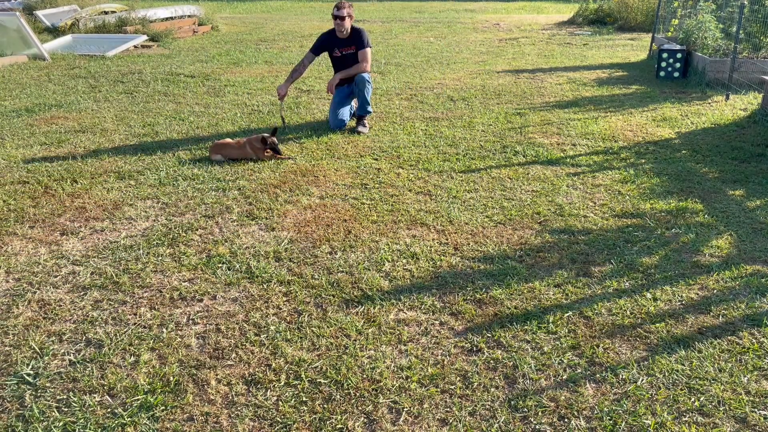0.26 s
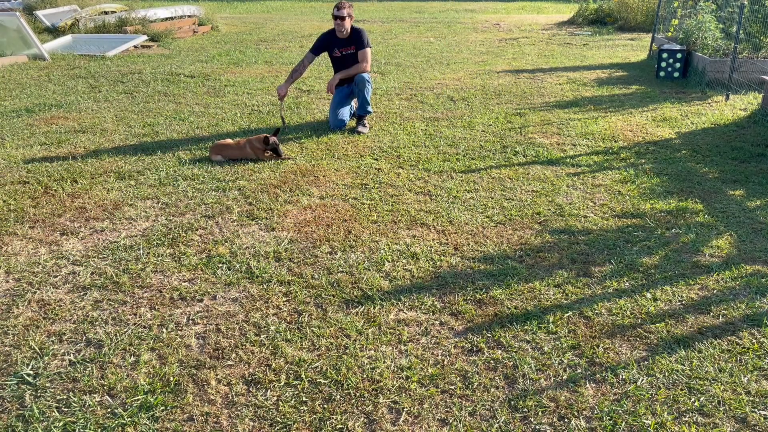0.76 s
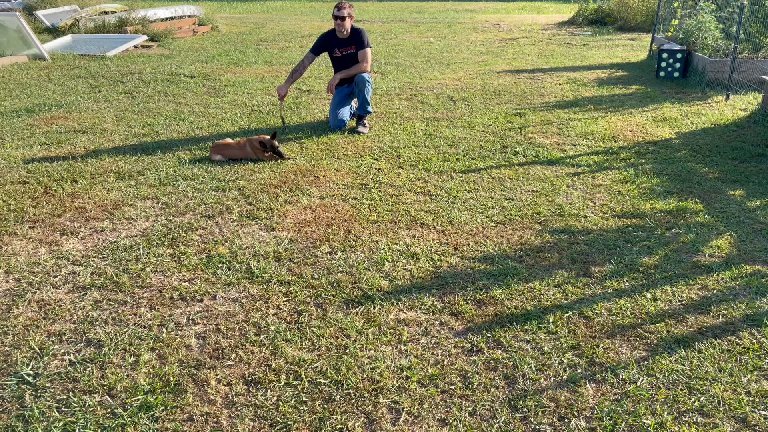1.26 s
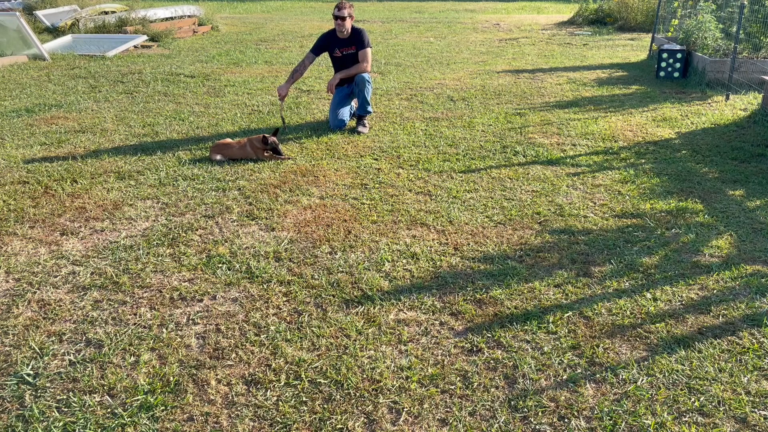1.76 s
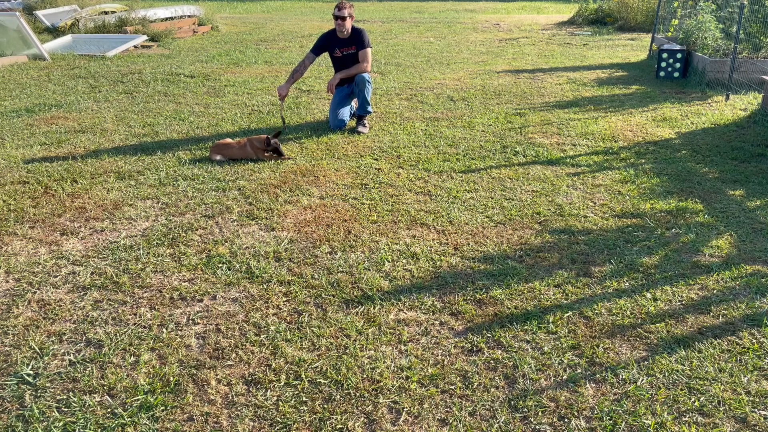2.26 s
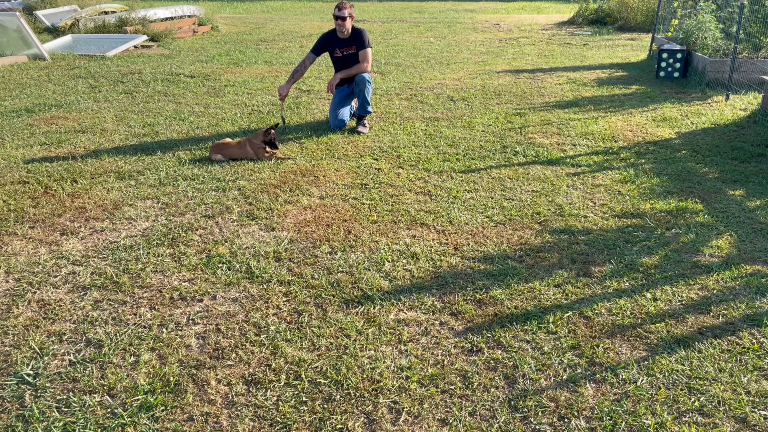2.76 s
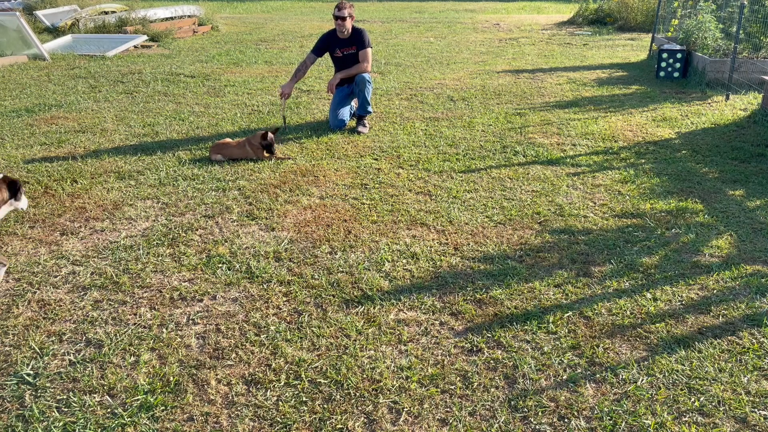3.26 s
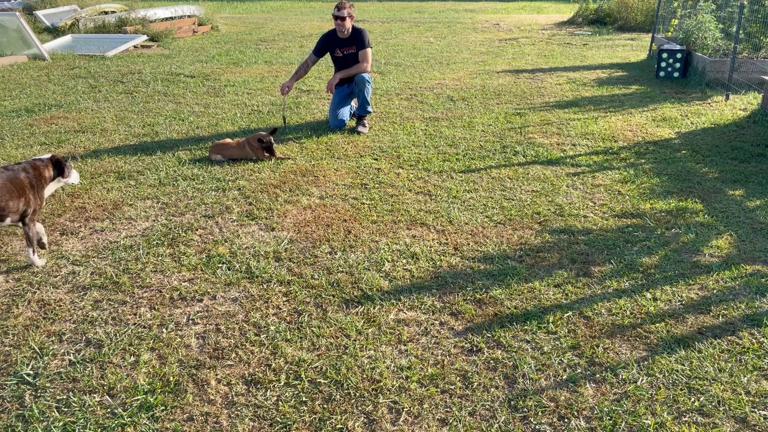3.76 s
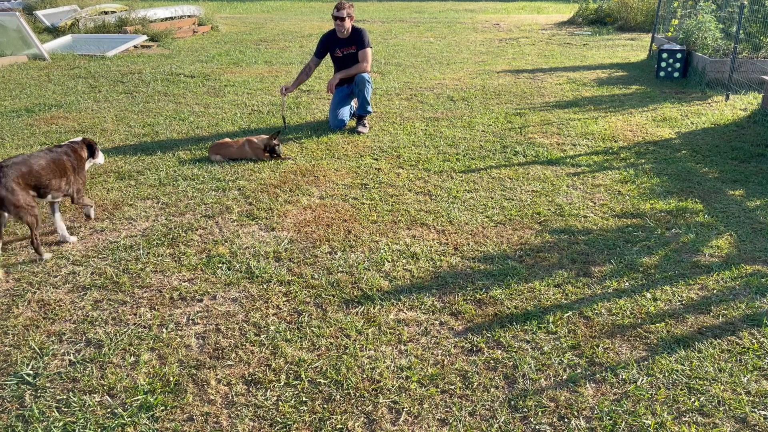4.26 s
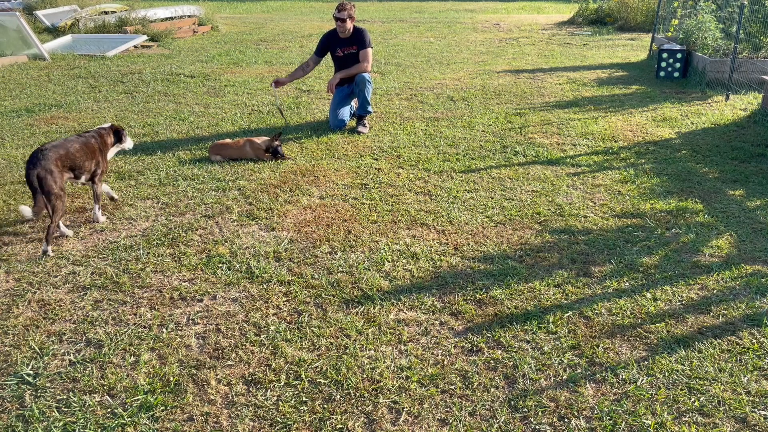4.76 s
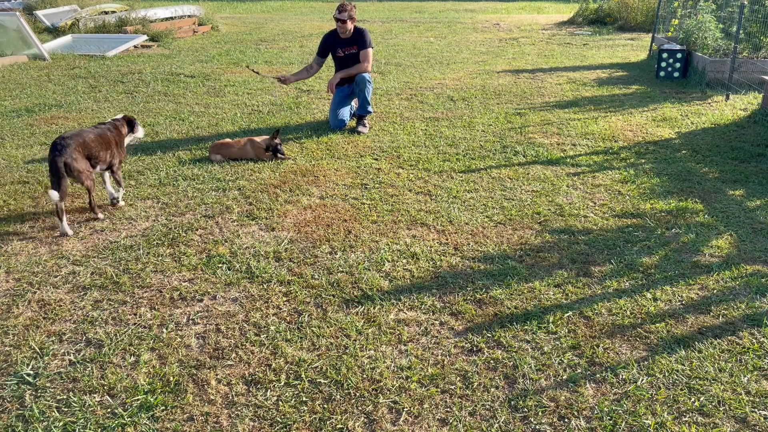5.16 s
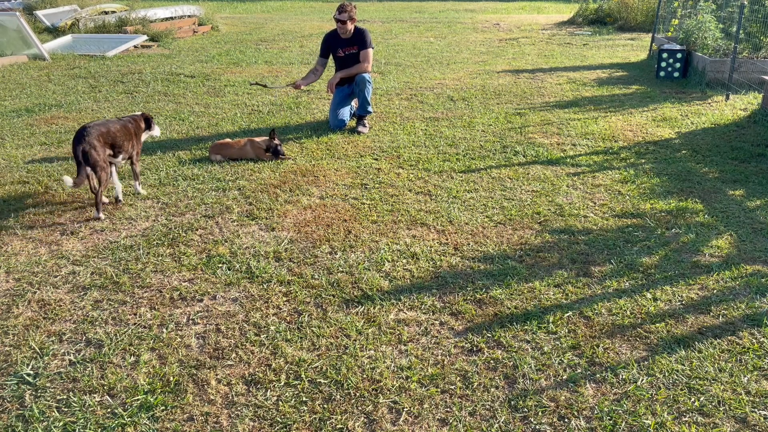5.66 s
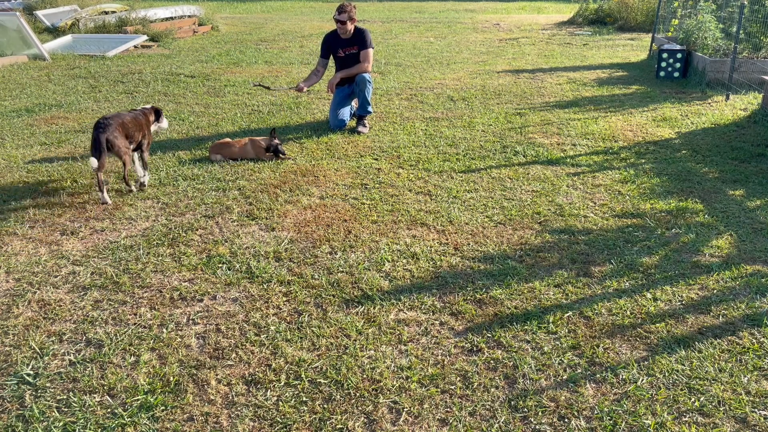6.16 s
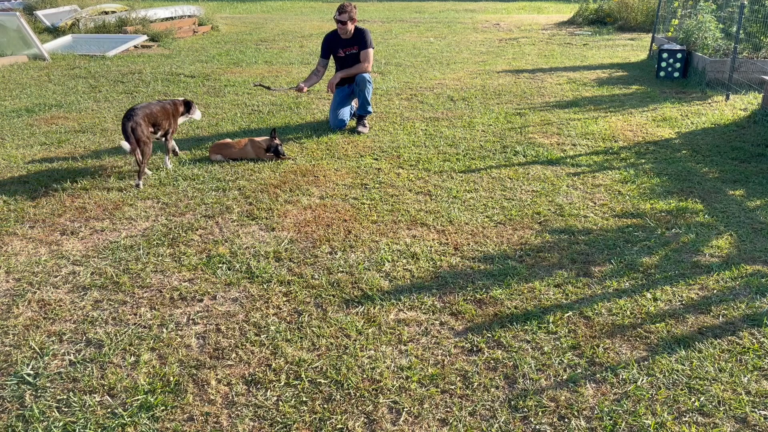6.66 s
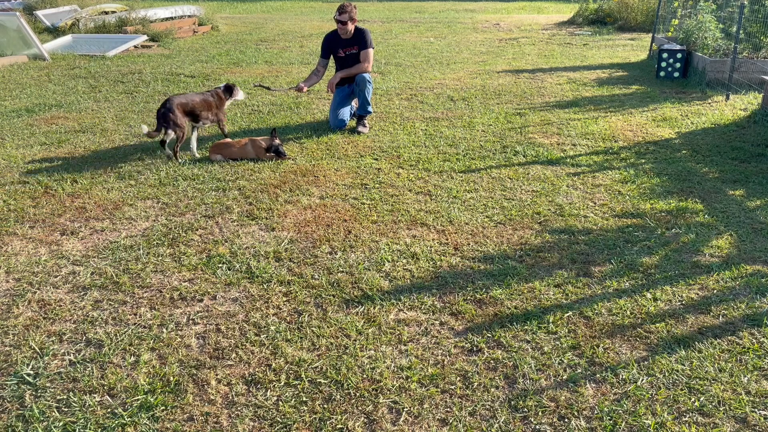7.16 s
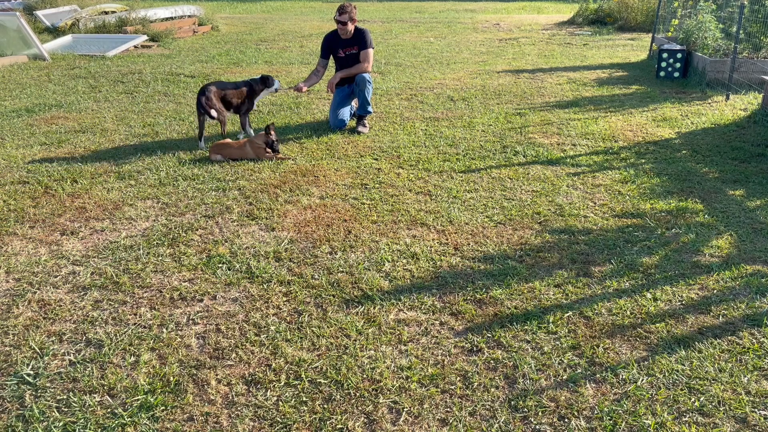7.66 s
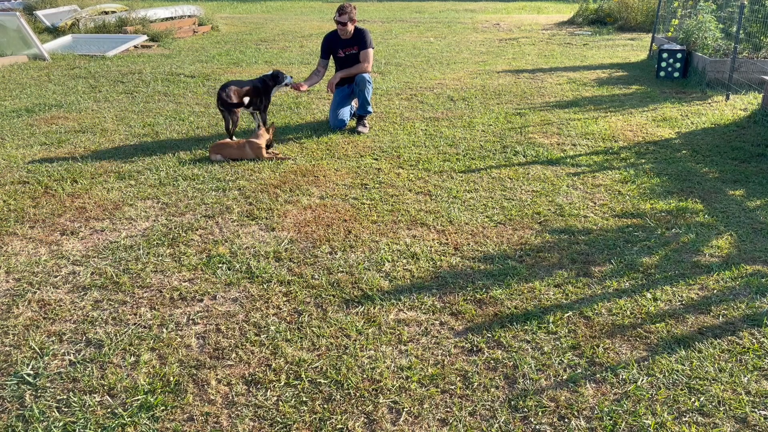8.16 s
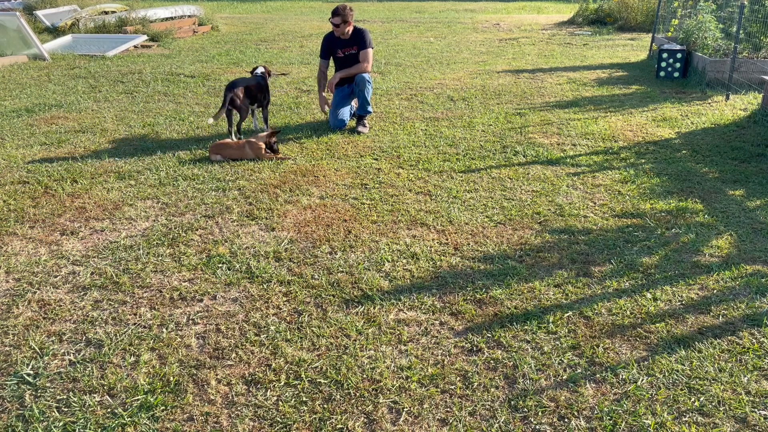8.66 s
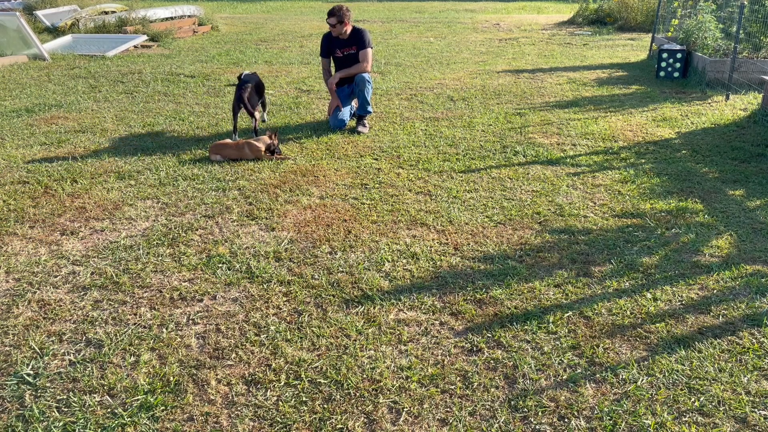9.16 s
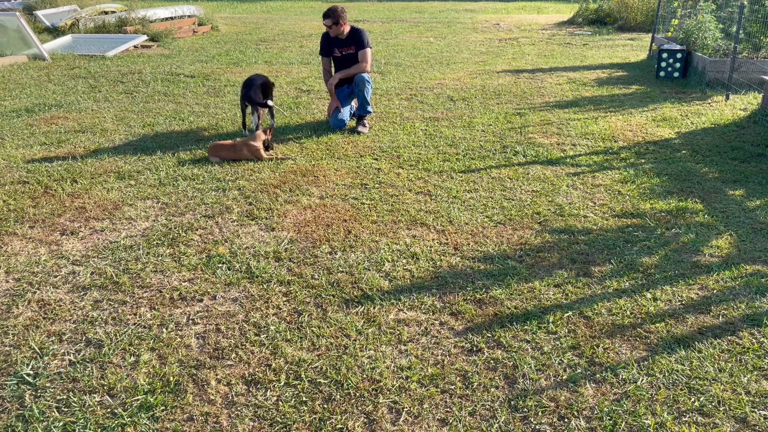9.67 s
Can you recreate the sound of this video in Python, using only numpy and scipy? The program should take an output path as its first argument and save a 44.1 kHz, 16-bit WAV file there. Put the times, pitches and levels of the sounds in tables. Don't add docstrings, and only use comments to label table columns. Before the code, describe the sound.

Katydids buzz, crickets trill and chirp over a grassy field while a songbird whistles and wind gusts rumble and thump on the microphone.

```python
import sys
import numpy as np
from scipy import signal
from scipy.fft import rfft, irfft
from scipy.io import wavfile
from scipy.ndimage import uniform_filter1d

SR = 44100
rng = np.random.default_rng(int(sys.argv[2]) if len(sys.argv) > 2 else 0)


def unload_audio(sound):
    columns = np.transpose(np.atleast_2d(sound))
    steps = np.round(np.clip(columns, -1, 1) * 32767)
    wavfile.write(sys.argv[1], SR, steps.astype(np.int16))


def level_to_linear(level):
    exponent = np.asarray(level, float) / 20
    return 10 ** exponent


N = 437913


def column_over_time(rows, column):
    table = np.array(rows)
    return np.interp(np.arange(N) / SR, table[:, 0], table[:, column])


def rms_one(x):
    return x / np.sqrt(np.mean(x ** 2) + 1e-20)


def at_hz(points):
    hz, value = np.transpose(points)
    bin_hz = np.arange(N // 2 + 1) * SR / N
    return np.interp(np.log(bin_hz + 1), np.log(hz), value)


def coloured(x, points):
    below = [(points[0][0] * .8, -90)]
    above = [(points[-1][0] * 1.1, -90)]
    return irfft(rfft(x) * level_to_linear(at_hz(below + list(points) + above)), N)


def drift(rate_hz):
    step = 40
    pole = np.exp(-2 * step * np.pi * rate_hz / SR)
    noise = rng.standard_normal(N // step + 2002)
    slow = signal.lfilter([1], [1, -2 * pole, pole * pole], noise)[2000:]
    return np.interp(np.arange(N) / step, np.arange(len(slow)), rms_one(slow))


def add(out, start_s, sound):
    i = max(round(start_s * SR), 0)
    out[..., i:i + sound.shape[-1]] += sound[..., :N - i]


def tone(hz, lead_rad):
    phase = 2 * np.pi * np.cumsum(hz) / SR
    return np.sin(phase + np.array([[lead_rad / 2], [-lead_rad / 2]]))


def katydid(rows, wing, depth_db, fall):
    strokes_per_s = column_over_time(rows, 1) + .5 * drift(3.1)
    cycle = (np.cumsum(strokes_per_s) / SR + rng.random()) % 1
    fall = np.clip(fall, .05, .5)
    swell = np.where(cycle < fall, 1 - cycle / fall, (cycle - fall) / (1 - fall))
    sway_db = 0.42 * drift(20) + 0.91 * drift(5.7)
    teeth = rng.standard_normal(N) * (rng.random(N) < .35)
    teeth = teeth * level_to_linear(depth_db * swell + sway_db)
    out = 0
    for hz, width_hz, level_db in wing:
        r = np.exp(-np.pi * width_hz / SR)
        b = (1 - r * r) / 2 * np.array([1, 0, -1])
        a = [1, -2 * r * np.cos(2 * np.pi * hz / SR), r * r]
        ring = signal.lfilter(b, a, signal.lfilter(b, a, teeth))
        out = out + level_to_linear(level_db) * ring
    return level_to_linear(column_over_time(rows, 2)) * rms_one(out)


# t/s, rate/Hz, level/dB
LOW_BUZZ = [(0, 72.5, -61), (.8, 74.5, -60), (2, 74.3, -63), (3.4, 73.6, -59.5), (4, 73, -61),
            (4.43, 72, -57.5), (4.47, 71.5, -89), (6.5, 75.6, -116), (7.1, 76, -63.5), (7.7, 74.2, -65),
            (8.3, 75.8, -63.5), (9.2, 74.3, -60), (9.93, 73, -64.5)]
MID_BUZZ = [(0, 61.7, -73), (1.5, 67, -79), (2.5, 65.97, -67), (3.5, 65.75, -62.5), (4.5, 65.9, -65.5),
            (5.8, 65, -61.5), (6.6, 64.85, -63.5), (7.2, 64.7, -63), (8.2, 60.85, -64), (9.93, 62.4, -63)]
HIGH_BUZZ = [(0, 70, -99), (4.2, 69, -99), (4.6, 70.7, -68), (5.2, 66, -64), (6.2, 68.54, -63),
             (6.8, 69, -66), (7.0, 67, -99), (9.93, 68.5, -99)]
# f/Hz, width/Hz, level/dB
LOW_WING = [(8500, 1530, -1), (9780, 1000, 0.5), (12200, 2000, -8.5)]
MID_WING = [(10290, 550, -2.5), (10860, 2300, -0.5), (13900, 2500, -8)]
HIGH_WING = [(11220, 1500, 3.5), (12700, 2200, 4.5), (15200, 3300, -4)]


def katydids():
    low = katydid(LOW_BUZZ, LOW_WING, depth_db=18, fall=.18)
    mid = katydid(MID_BUZZ, MID_WING, depth_db=18, fall=.18)
    high = katydid(HIGH_BUZZ, HIGH_WING, depth_db=17, fall=.2)
    return low + mid + high


def tree_cricket(hz, per_s, first_s, level_db, droop_hz):
    cycle = ((np.arange(N) / SR - first_s) * per_s + .03 * drift(.5)) % 1
    part = np.clip(cycle / .6, 0, 1)
    pitch_hz = hz - droop_hz * np.clip(part - .5, 0, 1) ** 2 + 30 * drift(60)
    sway_db = 1.5 * drift(1.2) + 2.5 * drift(12) + 2 * drift(150)
    return level_to_linear(level_db + sway_db) * np.sin(np.pi * part) ** 2 * tone(pitch_hz, 0)[0]


def tree_crickets():
    high = tree_cricket(hz=6860, per_s=22.18, first_s=4.669, level_db=-64.5, droop_hz=1200)
    low = tree_cricket(hz=6180, per_s=21.0, first_s=4.54, level_db=-71.5, droop_hz=500)
    return high + low


# f/Hz, phase/turns
PORT_TURNS = [(5800, 0), (7450, .4), (7750, .48), (8450, .52), (8950, .6), (10500, .9), (10900, .98),
              (12600, 1.02), (12800, 1.12), (13500, 1.4), (14200, 1.47), (16000, 1.52)]


def across_ports(x):
    turn = np.exp(1j * np.pi * at_hz(PORT_TURNS) * [[-1], [1]])
    return irfft(rfft(x) * turn, N)


def cricket_strokes(strokes, start_hz, end_hz, length_s, gain_db, lead_rad):
    out = np.zeros((2, N))
    x = np.linspace(0, 1, round(length_s * SR))
    shape = np.sin(np.pi * x) ** 1.5
    chance = rng.standard_normal((len(strokes), 2))
    for (mid_s, peak_db), (bend, sway) in zip(strokes, chance):
        glide_hz = (1 + 0.0076 * bend) * (start_hz + (end_hz - start_hz) * x ** 1.29)
        stroke = level_to_linear(peak_db + gain_db) * shape * tone(glide_hz, lead_rad + .25 * sway)
        add(out, mid_s - length_s / 2, stroke)
    return out


def chirps(rows, strokes):
    return [(s + later_s, peak_db + step_db) for s, peak_db in rows for later_s, step_db in strokes]


# t/s, peak level/dB
NEAR_CHIRPS = [(0.215, -61), (.709, -63), (1.311, -62.5), (1.899, -63.5), (2.522, -59), (3.055, -63),
               (3.598, -62.5), (4.115, -62), (4.612, -64), (5.166, -63.5), (5.692, -63), (6.224, -62),
               (6.74, -64.5), (7.197, -65), (7.76, -65.5), (8.287, -66.5), (8.792, -67.5), (9.3, -66),
               (9.77, -65.5)]
# t/s, level/dB
NEAR_STROKES = [
    (0, 2.5),
    (0.051, 4.5),
    (0.105, 5),
]
# t/s, peak level/dB
SINGLE_STROKES = [(.113, -60), (.169, -58), (.957, -64), (1.07, -59), (1.13, -66), (1.612, -64),
                  (1.662, -60), (1.716, -61), (1.775, -62), (2.458, -61.5), (2.412, -67), (3.206, -64),
                  (3.266, -60), (3.33, -63), (4.28, -60), (4.92, -78), (4.98, -69), (5.35, -68),
                  (5.933, -67), (9.73, -65), (1.012, -66), (4.36, -67), (6.39, -70), (7.4, -65),
                  (7.548, -71), (7.6, -67), (7.655, -67), (8.95, -68), (9.0, -65), (9.055, -64),
                  (9.45, -65), (9.495, -74)]
# t/s, peak level/dB
HIGH_CHIRPS = [(.142, -65), (.544, -72), (.958, -71), (1.324, -69), (1.78, -69), (2.005, -69),
               (2.543, -64.5), (2.99, -70.5), (3.405, -68.5), (3.853, -69), (4.27, -73), (4.66, -68),
               (5.135, -68), (5.6, -79), (6.052, -67), (6.482, -66.5), (6.876, -65), (7.3, -73),
               (7.745, -69), (8.201, -67), (8.652, -67.5), (9.122, -69), (9.538, -71)]
# t/s, level/dB
HIGH_STROKES = [
    (0, 0.5),
    (.047, 1),
    (0.095, 0.5),
]


def field_crickets():
    near = cricket_strokes(chirps(NEAR_CHIRPS, NEAR_STROKES), start_hz=4600, end_hz=3955,
                           length_s=.032, gain_db=1.5, lead_rad=1.7)
    second = cricket_strokes(SINGLE_STROKES, start_hz=4550, end_hz=4150,
                             length_s=.035, gain_db=1.5, lead_rad=1.0)
    high = cricket_strokes(chirps(HIGH_CHIRPS, HIGH_STROKES), start_hz=4700, end_hz=4560,
                           length_s=.028, gain_db=3.5, lead_rad=0.9)
    return near + second + high


def whistle(out, start_s, hz, level_db, lead_rad):
    t = np.arange(len(hz)) / SR
    ends = np.clip(np.minimum(t, t[-1] - t) / 0.0092, 0, 1)
    add(out, start_s, level_to_linear(level_db) * ends * tone(hz, lead_rad))


# top t/s, slide/s, top f/Hz, end f/Hz, peak level/dB
SWOOPS = [(.075, 0.024, 4720, 4600, -52), (.8, 0.04, 4610, 3970, -56), (1.03, 0.07, 4210, 3750, -63),
          (2.311, 0.028, 4480, 3720, -55.5), (2.704, 0.024, 4150, 4000, -60), (2.775, .06, 3940, 3460, -63),
          (3.235, 0.1, 4340, 3440, -58), (3.752, 0.04, 4720, 4040, -53), (3.94, 0.098, 4100, 3430, -55.5),
          (4.025, 0.21, 4330, 3340, -60.5), (4.58, 0.039, 4720, 3980, -56),
          (4.835, 0.13, 4550, 3420, -57.5), (5.665, 0.032, 4720, 4550, -56), (5.965, 0.1, 4270, 3390, -58),
          (7.255, 0.026, 4330, 4200, -60.5), (7.348, 0.033, 4350, 3750, -57),
          (7.435, 0.09, 4130, 3370, -56), (7.907, 0.034, 4570, 4360, -53), (8.186, 0.041, 4150, 3600, -57)]
# start t/s, length/s, start f/Hz, end f/Hz, level/dB
HOLDS = [(.84, 0.16, 3930, 4010, -67.5), (1.09, 0.089, 3740, 3540, -62.5), (2.725, 0.049, 3960, 3950, -62),
         (2.83, .05, 3800, 4050, -70), (7.385, 0.036, 3750, 4050, -65), (2.336, 0.11, 3700, 4000, -65),
         (3.06, 0.17, 3920, 4000, -67.5), (3.78, 0.14, 3960, 4150, -59.5), (4.6, 0.23, 3990, 4150, -63.5),
         (4.98, 0.064, 3480, 3450, -63.5), (5.72, 0.24, 4000, 4190, -64.5), (6.98, .09, 3860, 3900, -69),
         (7.95, 0.23, 4050, 4170, -59.5)]
# t/s, left lead/rad
PERCH = [(.1, 1.3), (1.0, 1.3), (2.9, 1.27), (3.05, 1.5), (6.1, 1.9), (7.0, 1.2), (7.4, 1), (7.9, 1.94)]
# start t/s, length/s, start f/Hz, end f/Hz, level/dB
PEEPS = [
    (.68, 0.08, 3220, 3010, -65.5),
    (.755, 0.042, 3050, 2760, -69),
    (0.873, 0.026, 2500, 2380, -68),
    (2.92, .03, 2430, 2340, -67),
]
FLICK_S, FLICK_HZ, FLICK_DB = .027, 167, -6
SLIDE_BEND, SLIDE_LOSS_DB, SETTLE_S = 1.5, 5.5, .04
LOW_START_HZ, LOW_START_BEND = 4200, .7


def songbird():
    out = np.zeros((2, N))
    perch_s, perch_rad = np.transpose(PERCH)
    for s, slide_s, top_hz, end_hz, peak_db in SWOOPS:
        t = np.arange(-FLICK_S, slide_s, 1 / SR)
        before = np.clip(-t / FLICK_S, 0, 1)
        after = np.clip(t / slide_s, 0, 1)
        bend = SLIDE_BEND if top_hz > LOW_START_HZ else LOW_START_BEND
        slide = 1 - (1 - after) ** bend
        hz = top_hz - FLICK_HZ * before - (top_hz - end_hz) * slide
        hz = uniform_filter1d(hz, size=500, mode="nearest")
        level_db = peak_db + FLICK_DB * before - SLIDE_LOSS_DB * np.clip(t / SETTLE_S, 0, 1)
        whistle(out, s - FLICK_S, hz, level_db, np.interp(s, perch_s, perch_rad))
    for s, length_s, start_hz, end_hz, level_db in HOLDS:
        climb = np.sin(np.linspace(0, np.pi / 2, round(length_s * SR)))
        hz = start_hz + (end_hz - start_hz) * climb
        whistle(out, s, hz, level_db, np.interp(s, perch_s, perch_rad))
    for s, length_s, start_hz, end_hz, level_db in PEEPS:
        hz = np.linspace(start_hz, end_hz, round(length_s * SR))
        whistle(out, s, hz, level_db, 0.28)
    return out * level_to_linear(2.2 * drift(25) - 1.5)


# top t/s, top f/Hz, peak level/dB, length/s
FAR_CALLS = [
    (2.064, 1456, -68, 0.091),
    (2.417, 1466, -77, .07),
    (2.514, 1427, -69.5, 0.083),
    (2.775, 1460, -76, .06),
    (2.843, 1490, -73.5, 0.086),
    (3.047, 1450, -68, 0.11),
    (3.153, 1460, -72, 0.12),
    (3.423, 1457, -71, 0.12),
    (3.825, 1370, -76, .06),
    (4.187, 1450, -70.5, 0.11),
]
ARCH_RISE_S, ARCH_FALL_S = .047, .059
ARCH_BEND, ARCH_TOP_AT = 1.7, .38


def far_bird():
    out = np.zeros((2, N))
    for s, top_hz, peak_db, length_s in FAR_CALLS:
        x = np.linspace(0, 1, round(length_s * SR))
        t = (x - ARCH_TOP_AT) * length_s
        below = np.where(t < 0, -t / ARCH_RISE_S, t / ARCH_FALL_S) ** ARCH_BEND / 4
        shape = 1 - (2 * x - 1) ** 8
        add(out, s + t[0], level_to_linear(peak_db) * shape * tone(top_hz * (1 - below), -1.05))
    return out * level_to_linear(2.2 * drift(33) - 1.5) * level_to_linear(np.array([[1.5], [-1.5]]))


# delay t/s, level/dB
ECHOES = [
    (.017, -12),
    (.041, -15),
    (.073, -19),
]


def outdoors(x):
    out = x.copy()
    for delay_s, level_db in ECHOES:
        add(out, delay_s, level_to_linear(level_db) * x[::-1])
    return out


# t/s, level/dB
BREEZE = [(1.05, -67.5), (1.27, -49), (1.57, -64), (2.2, -43.5), (2.4, -59.5), (2.7, -43.5), (3.9, -44.5),
          (4.22, -48.5), (4.5, -63), (4.8, -64.5), (5.2, -42.5), (5.87, -72), (6.21, -44), (6.4, -65),
          (7.7, -88), (8.95, -59.5), (9.35, -40), (9.63, -62)]
# t/s, peak level/dB, level above 110 Hz re peak/dB, hold/s
BUFFETS = [(1.296, -35.5, -30, .005), (1.637, -36.5, -29, 0.016), (1.683, -35, -13, 0.0039),
           (5.787, -52.5, -7, 0.04), (1.822, -42, -25, 0.0058), (1.967, -28.5, -6, 0.0043),
           (2.606, -41.5, -15, 0.045), (2.88, -46, -2.5, 0.023), (3.026, -44.5, -5.5, 0.0041),
           (3.182, -37.5, -8, 0.044), (3.298, -39.5, -24, 0.069), (3.392, -32.5, -13.5, 0.053),
           (3.555, -44, -25, .02), (3.647, -38, -29, 0.0046), (3.707, -30.5, -13, 0.08),
           (3.854, -34.5, -12, 0.0062), (3.922, -33, -14, 0.061), (4.132, -33, -6, .01),
           (4.293, -47, -30, 0.041), (4.356, -42, -25, .005), (4.653, -35, -12, 0.0031),
           (4.917, -42, -40, 0.023), (5.155, -34.5, -8.5, 0.009), (5.41, -34.5, 0, 0.066),
           (5.495, -28, -5, 0.0097), (5.595, -39.5, -19, .005), (5.665, -38, -9, 0.0035),
           (8.612, -42, -16.5, 0.046), (9.07, -42, -39, 0.016), (9.24, -31, -24, 0.006),
           (9.668, -42.5, -14, 0.03), (9.756, -29.5, -8, 0.012), (9.822, -36.5, -26, 0.086)]
BREEZE_BRIGHT_DB, FLUTTER_DB = -21, 4.5
BUFFET_RISE_DB_PER_S, BUFFET_FALL_DB_PER_S = 559, 398
BRIGHT_LEAD_S, BRIGHT_QUICKER = .0077, 1.9


def flow():
    t = np.arange(N) / SR
    breeze_db = column_over_time(BREEZE, 1) + FLUTTER_DB * drift(16.2)
    breeze_db -= 1.5 * np.clip(-61 - breeze_db, 0, 20)
    low_power = level_to_linear(2 * breeze_db)
    high_power = level_to_linear(2 * (breeze_db + BREEZE_BRIGHT_DB))
    for s, peak_db, bright_db, hold_s in BUFFETS:
        near = slice(round((s - .3) * SR), round((s + .5) * SR))
        parts = [(low_power, s, peak_db, 1),
                 (high_power, s - BRIGHT_LEAD_S, peak_db + bright_db, BRIGHT_QUICKER)]
        for power, start_s, level_db, quicker in parts:
            since_s = t[near] - start_s
            rise_db = BUFFET_RISE_DB_PER_S * np.clip(-since_s, 0, 1)
            fall_db = BUFFET_FALL_DB_PER_S * np.clip(since_s - hold_s, 0, 1)
            power[near] += level_to_linear(2 * (level_db - quicker * (rise_db + fall_db)))
    return np.sqrt(low_power), np.sqrt(high_power)


def evened(x, size):
    return x / np.sqrt(uniform_filter1d(np.mean(x ** 2, axis=0), size) + 1e-20)


# f/Hz, level per Hz/dB
RUMBLE = [(22, -35), (32, -11.5), (45, 1.5), (64, 3), (85, -2), (115, -13), (160, -22.5)]


def wind():
    low_gain, high_gain = flow()
    mid, side, top_mid, top_side = rng.standard_normal((4, N))
    low = evened(coloured(mid + 0.21 * side * [[1], [-1]], RUMBLE), size=1500)
    bright = [(90, 2.0), (120, 3.0), (200, -10.0), (320, -32.0), (450, -43)]   # f/Hz, level/dB
    high = coloured(top_mid + 0.18 * top_side * [[1], [-1]], bright)
    high = evened(high, size=1200) * level_to_linear(1.5 * drift(22))
    return level_to_linear(-1.6) * (low_gain * low + high_gain * high)


# t/s, peak level/dB, final f/Hz
THUMPS = [(1.428, -47, 64), (1.952, -30, 122), (2.578, -32.5, 111), (4.624, -27.5, 83),
          (5.649, -23.5, 66.6), (6.126, -41, 68.1), (6.287, -44, 105.5), (6.853, -46, 57.6),
          (7.188, -45.5, 56), (8.704, -36, 50.7), (2.485, -37.5, 57), (8.475, -43.5, 58.5),
          (8.769, -50, 59.6), (8.891, -53, 61.9), (8.96, -51, 50), (9.45, -34, 55.5), (9.49, -40, 59.6)]


def thumps():
    out = np.zeros((2, N))
    t = np.arange(3500) / SR
    shape = (t / 0.011) ** 2 * np.exp(2 - 2 * t / 0.014)
    chance = rng.standard_normal((len(THUMPS), 2))
    for (s, peak_db, hz), (sign, lean) in zip(THUMPS, chance):
        glide_hz = hz * (1 + 2.84 * np.exp(-t / 0.0041))
        add(out, s, np.sign(sign) * level_to_linear(peak_db - 6.5) * shape * tone(glide_hz, 0.15 * lean))
    return out


# t/s, peak level/dB, ring f/Hz
SNAPS = [
    (1.676, -48, 188),
    (1.957, -45, 230),
    (2.745, -51, 307),
    (2.766, -52.5, 326),
    (3.385, -50, 198),
    (4.63, -45.5, 200),
    (5.402, -41, 170),
    (5.446, -42, 236),
    (5.648, -38, 222),
    (9.746, -49, 199),
]


def snaps():
    out = np.zeros((2, N))
    x = np.linspace(0, 1, 530)
    shape = np.sin(np.pi * x ** .7) ** 2
    for s, peak_db, hz in SNAPS:
        add(out, s - .002, level_to_linear(peak_db) * shape * tone(hz * (1.35 - .7 * x), .2))
    return out


# t/s, peak level/dB, ring f/Hz
KNOCKS = [
    (6.7844, -40.5, 1010),
    (6.787, -46, 415),
    (6.7912, -51, 700),
    (7.211, -48, 1890),
    (7.214, -48, 840),
    (7.212, -51, 3500),
]


def knocks():
    out = np.zeros(N)
    t = np.arange(900) / SR
    for s, peak_db, hz in KNOCKS:
        ring = np.exp(-t * hz / 0.65) * np.sin(2 * np.pi * hz * t)
        add(out, s, level_to_linear(peak_db) * ring * 1.52)
    return out * level_to_linear(np.array([[1.5], [-1.5]]))


def cricket_crowd(level_db):
    count = 420
    times_s = rng.uniform(0, N / SR, count)
    levels_db = level_db + 4.2 * rng.standard_normal(count)
    return cricket_strokes(np.transpose([times_s, levels_db]), start_hz=4720, end_hz=4150,
                           length_s=.047, gain_db=2.5, lead_rad=1.0)


# f/Hz, level per Hz/dB
CHORUS = [(5200, -22), (6000, -9.5), (6800, 1), (7500, -3.5), (8400, -11), (9300, 4.5), (10400, -8),
          (11500, 0), (13000, -5), (14500, -9), (15800, -4)]


def far_insects():
    far = coloured(rng.standard_normal((3, N)), CHORUS)
    return level_to_linear(-61.5 + .5 * drift(15)) * rms_one(far)


# f/Hz, level per Hz/dB
AIR = [(30, -21), (58, 3.5), (83, -1.5), (150, -9.5), (320, -9.5), (600, -16), (1090, -22.5), (1840, -26),
       (2420, -27), (2890, -30.5), (3770, -26.5), (4400, -16), (5020, -30), (6000, -35)]
# f/Hz, likeness/0-1
AIR_ALIKE = [(60, 0.62), (400, 0.73), (750, 0.39), (1200, 0), (2000, 0.58), (2600, 0.2), (6000, 0.78)]


def air():
    mid, side = rng.standard_normal((2, N))
    alike = np.clip(at_hz(AIR_ALIKE), 0, 1)
    both = np.sqrt(1 + alike) * rfft(mid) + np.sqrt(1 - alike) * rfft(side) * [[1], [-1]]
    noise = rms_one(coloured(irfft(both, N), AIR))
    return level_to_linear(-62 + .5 * drift(3)) * noise * level_to_linear(np.array([[.4], [-.4]]))


def scene():
    far = far_insects()
    treble = across_ports(katydids() + tree_crickets() + far[0])
    scattered = level_to_linear(-22 + 4 * drift(12)) * far[1:]
    crickets = field_crickets() + cricket_crowd(level_db=-77.5)
    birds = outdoors(songbird() + far_bird())
    gusts = wind() + thumps() + snaps()
    return treble + crickets + birds + gusts + knocks() + scattered + air()


def roll_off(x):
    return signal.sosfilt(signal.butter(12, 15850, fs=SR, output="sos"), x)


def record(dry):
    low_pass = signal.cheby2(12, 70, 16500, fs=SR, output="sos")
    mix = signal.sosfilt(low_pass, dry)
    return roll_off(mix)


dry = scene()
out = record(dry)
unload_audio(out)
```